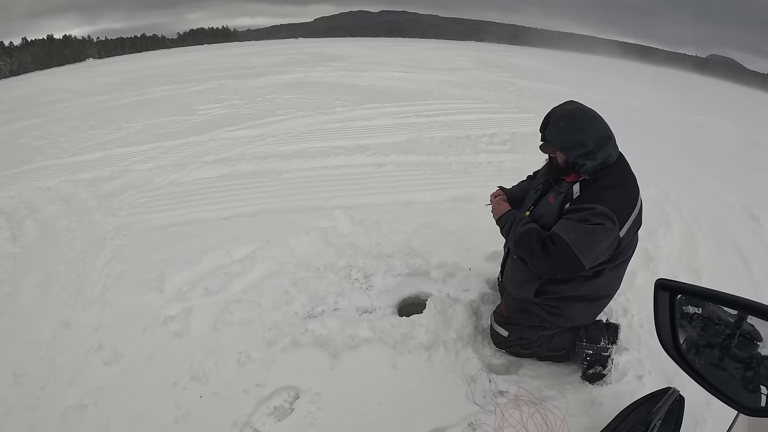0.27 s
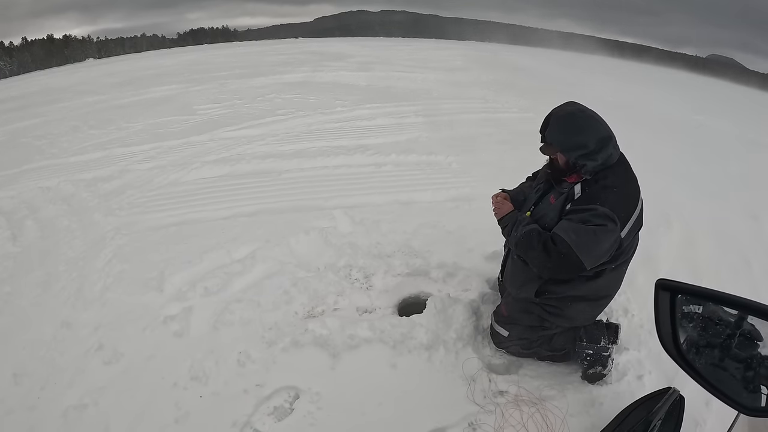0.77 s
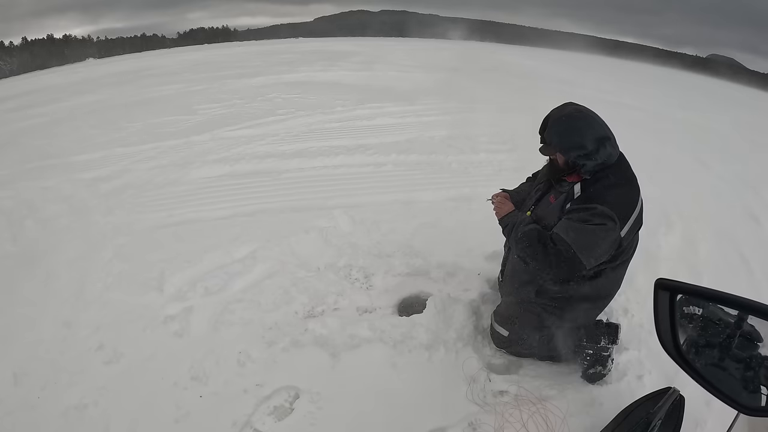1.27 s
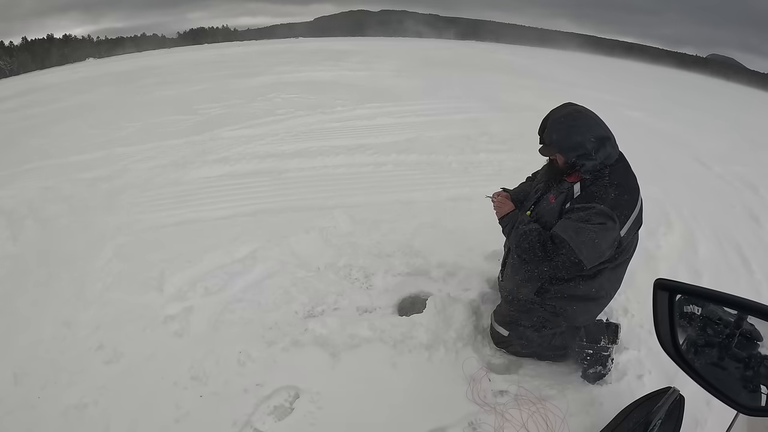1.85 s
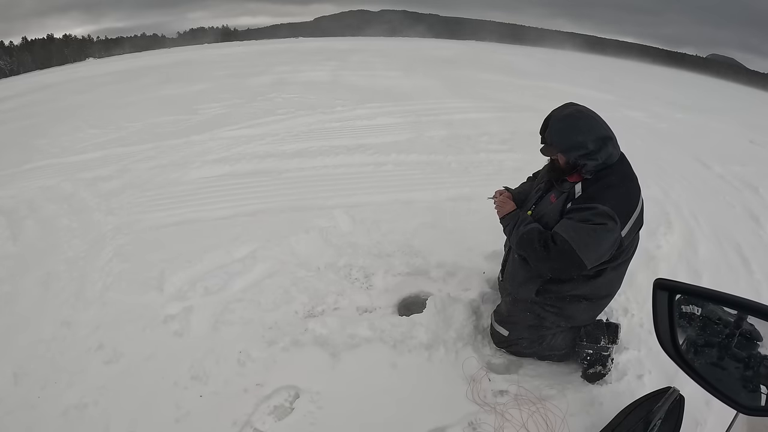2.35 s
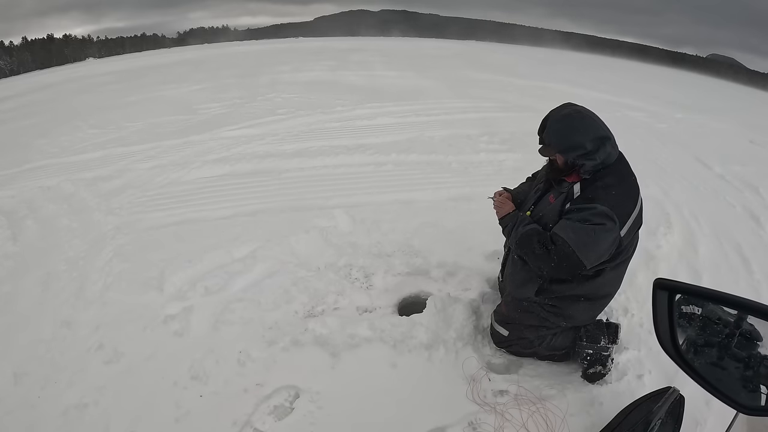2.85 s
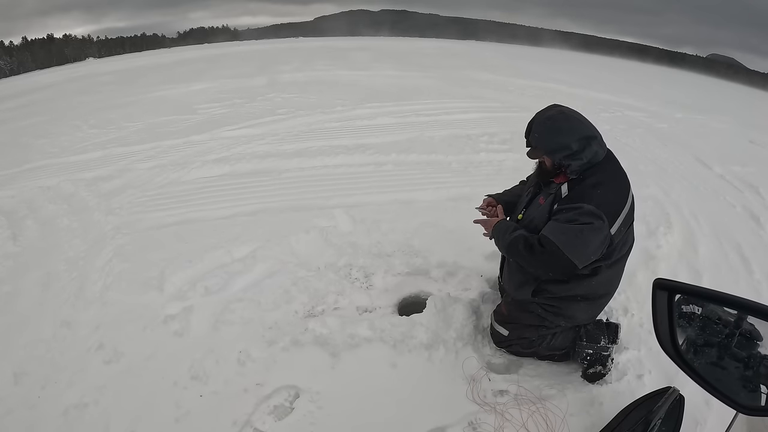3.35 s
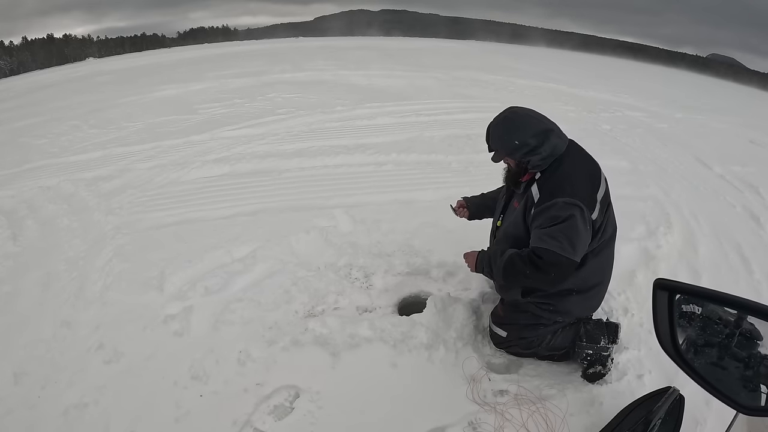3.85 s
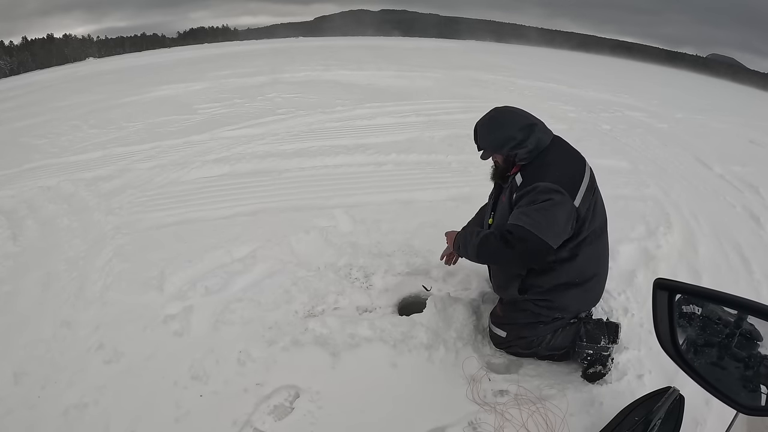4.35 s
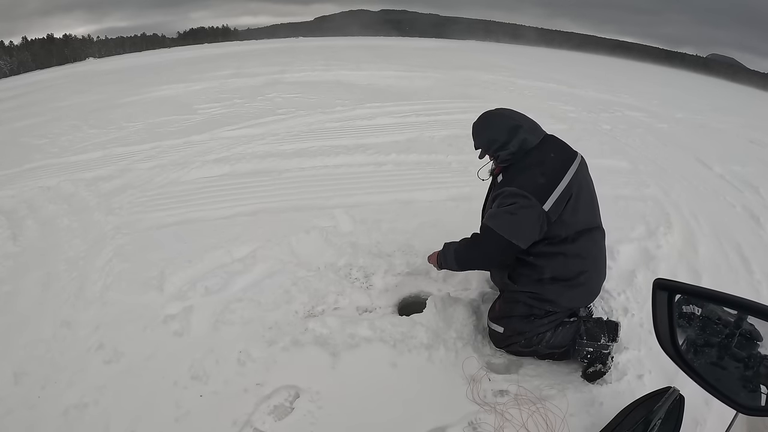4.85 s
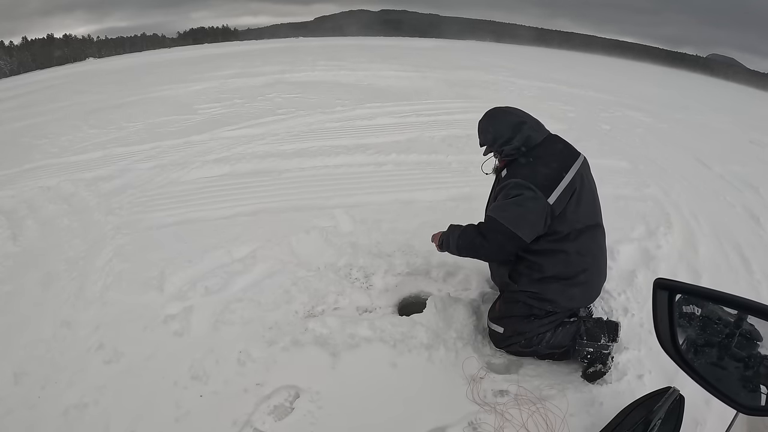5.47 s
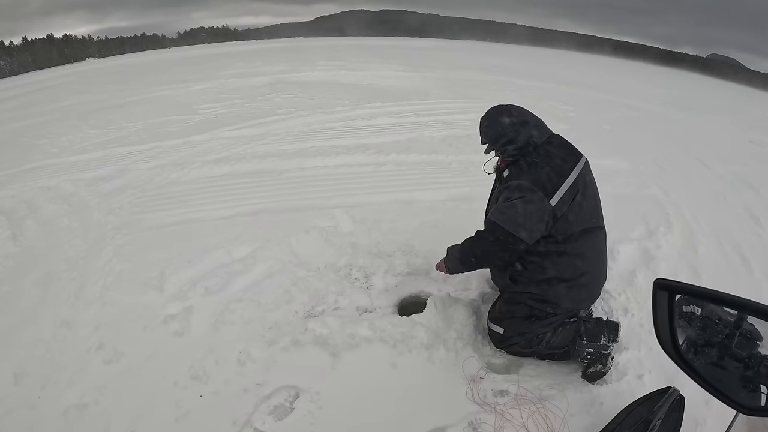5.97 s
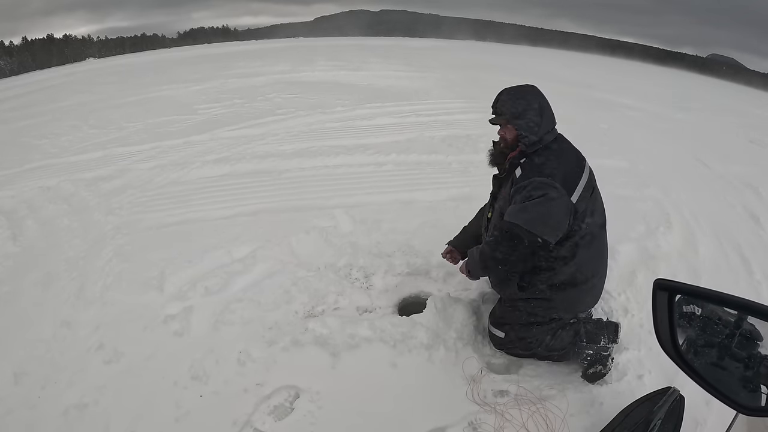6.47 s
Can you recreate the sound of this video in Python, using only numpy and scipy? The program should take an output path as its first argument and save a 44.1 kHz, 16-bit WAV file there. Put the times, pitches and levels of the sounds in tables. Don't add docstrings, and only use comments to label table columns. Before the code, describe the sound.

Continuous strong wind blows directly on a small housed microphone on an open snowy lake. Deep thumps and low rumble dominate, with a duller roar and thin hiss above. The gusts flutter irregularly, swelling early, then thumping harder towards the end. A few tiny ice grains tick on the casing. No echo, no voice.

```python
import sys
import numpy as np
from scipy import signal
from scipy.fft import rfft, irfft
from scipy.io import wavfile
from scipy.ndimage import uniform_filter1d

SR = 44100
rng = np.random.default_rng(int(sys.argv[2]) if len(sys.argv) > 2 else 0)


def transcribe(signal):
    frames = np.atleast_2d(signal).T
    limited = np.clip(frames, -1, 1)
    pcm = np.round(limited * 32767).astype(np.int16)
    wavfile.write(sys.argv[1], SR, pcm)


def invert_db(x):
    u = np.asarray(x, float) / 20
    return 10 ** u


N = 296352
HZ = np.fft.rfftfreq(N, 1 / SR) + 1e-3


def wind(burst_db=0.17, fine_db=0.91, shared_db=0.5, own_db=0.35):
    # time in seconds, wind strength in dB, how squarely it strikes the port in dB.
    gusts = [(0.03, -49.5, 26.5), (0.12, -52, 26.5), (0.16, -48, 25.5), (0.36, -41, 16.5), (1.1, -45, 19.5),
             (1.31, -44, 16), (1.72, -47.5, 21.5), (1.92, -49.5, 18), (2.77, -48, 20.5),
             (2.89, -49.5, 20.5), (3.55, -51.5, 24), (4.0, -48.5, 20.5), (4.13, -51, 20.5),
             (4.59, -51, 22.5), (5.22, -54, 26.5), (5.45, -50, 25), (6.32, -49, 22), (6.69, -51.5, 23)]
    # frequency in Hz, dB per dB of strength, dB per dB of square strike.
    response = [
        (89.5, 1.5, 1.49),
        (450, 1.0, 0.39),
        (2500, 1.0, -0.02),
        (6500, 1.63, 0.35),
        (11000, 1.5, 0.4),
    ]
    # time in seconds, frequency of their size in Hz, lift in dB.
    vortices = [(0.095, 84, 2), (0.269, 59.7, 11.5), (0.369, 678, 0), (0.449, 486, -1), (0.454, 81.4, 10.5),
                (0.988, 120, 5), (1.382, 478, 5.5), (1.716, 59.5, 0), (2.115, 60.4, 4.5),
                (2.504, 84.4, 4.4), (2.599, 84, 2.5), (2.699, 171, 4.5), (2.774, 61, 3.5), (2.784, 960, 6),
                (3.452, 58, -3.5), (3.577, 59, 8.5), (3.746, 124, 7.5), (3.871, 59.7, 5.5),
                (4.006, 336, -0.5), (4.475, 85, 9), (4.749, 84, 3), (4.834, 60.6, 11), (5.268, 674, 8),
                (5.807, 60.5, 13), (5.862, 339, 8), (5.897, 61.6, 11), (6.071, 240, 8), (6.465, 88, 13.5)]
    # time in seconds, frequency of their size in Hz, lift in dB.
    puffs = [(.28, 3500, 1), (.47, 2000, 1.5), (.61, 6000, -0.5), (1.21, 5000, 0.5), (1.44, 3000, 0),
             (2.69, 2000, 3.5), (3.0, 3000, 3), (3.14, 4000, -4), (3.31, 2500, -3), (3.40, 2500, 0),
             (3.59, 3000, -2), (3.66, 4000, 0), (4.02, 2500, 1.5), (5.38, 3000, 2.5), (6.07, 11000, 0.5),
             (5.8, 7970, 2), (6.27, 5000, 2), (6.46, 3500, 3.5)]
    # time in seconds, frequency in Hz, lift in dB.
    spindrift = [
        (1.3, 9000, 1.5),
        (2.0, 11000, 3),
        (2.75, 11000, -2),
        (6.05, 12000, 5),
        (6.5, 12000, 3),
    ]

    gust_s, *columns = np.transpose(gusts)
    t = np.arange(N) / SR
    strength, strike = (np.interp(t, gust_s, c - np.mean(c)) for c in columns)
    hz, per_strength, per_strike = np.transpose(response)
    size_octave = np.log2(hz)
    burst, fine, shared = walk(30), walk(70), walk(20)
    turbulence = 0
    for octave in np.arange(4, 14.1, .5):
        db = np.interp(octave, size_octave, per_strength) * strength
        db += np.interp(octave, size_octave, per_strike) * strike
        db += passing(vortices, 0.011, 0.76, octave)
        db += passing(puffs, 0.03, 2.3, octave)
        db += passing(spindrift, 0.14, 0.68, octave)
        db -= 10 * np.log10(np.mean(invert_db(db) ** 2))
        shared = 0.77 * shared + 0.48 * walk(18)
        db += burst_db * burst + fine_db * fine + shared_db * shared
        db += own_db * walk(6)
        turbulence = turbulence + invert_db(db) * band(rng.standard_normal(N), octave, 0.52)
    heard = irfft(rfft(turbulence) * housing(), N)
    return level(heard, -25.5)


def passing(rows, length_s, octaves, octave):
    s, hz, db = np.transpose(rows)
    t = np.arange(0, N / SR, .002)
    bells = np.exp(-.5 * ((t[:, None] - s) / length_s) ** 2)
    likeness = np.exp(-.5 * ((octave - np.log2(hz)) / octaves) ** 2)
    return np.interp(np.arange(N) / SR, t, bells @ (db * likeness))


def walk(rate):
    hold = int(SR / rate)
    w = np.repeat(rng.standard_normal(N // hold + 1), hold)
    w = uniform_filter1d(uniform_filter1d(w, hold), hold)[:N]
    return w / w.std()


def band(x, octave, width):
    away = np.clip((np.log2(HZ) - octave) / width, -1, 1)
    return irfft(rfft(x) * np.cos(away * np.pi / 2), N)


def housing():
    # frequency in Hz, spectrum level in dB per Hz.
    through_housing = [(15, -35.5), (25, -9.5), (55, -0.5), (146, 0.5), (363, -4.5), (475, -9.5), (537, -8),
                       (835, -12.5), (1020, -22), (1330, -27), (4000, -37), (7230, -52.5), (8800, -65),
                       (11400, -95), (19400, -120)]
    # frequency in Hz, spectrum level in dB per Hz.
    through_port = [
        (9250, -67.5),
        (9600, -65),
        (11500, -61),
        (12400, -66),
        (13100, -75.5),
        (13800, -88),
    ]
    below = [row for row in through_housing if row[0] < 9000]
    hz, db = np.transpose(below + list(through_port))
    notch_hz, notch_width_hz, notch_db = 9085, 100, -27
    notch = notch_db * np.exp(-((HZ - notch_hz) / notch_width_hz) ** 2)
    return invert_db(np.interp(np.log(HZ), np.log(hz), db) + notch)


def level(x, db):
    return x * invert_db(db) / np.sqrt(np.mean(x ** 2))


def ice(shell_hz=4700, port_hz=11300, shell_s=.00012, port_s=.0003, stray_rate=30, stray_db=-72, spread_db=5.0):
    # time in seconds, peak level in dB, port ring relative to the shell in dB.
    grains = [(0.183, -45, -33), (0.264, -30, -32), (2.9697, -39, -14), (3.1697, -47, -30),
              (3.2607, -31, -30), (3.7465, -52, -10), (3.8882, -51, -1), (4.1252, -48, -6),
              (4.1300, -53, -8), (4.678, -51, -7), (4.9395, -37, -22), (5.040, -39, -20), (5.624, -48, -25),
              (6.088, -50, -14)]
    stray = rng.random((int(stray_rate * N / SR), 2))
    faint = [(a * (N / SR - .01), stray_db - spread_db * np.log(b), -12.0) for a, b in stray]
    rows = list(grains) + faint
    chance = rng.standard_normal((len(rows), 400))
    knocks = np.zeros((2, N + 400))
    for (s, db, port_db), c in zip(rows, chance):
        shell_knock = ring(shell_hz, shell_s, c)
        port_knock = invert_db(port_db) * ring(port_hz, port_s, c[::-1])
        start = int(s * SR)
        knocks[:, start:start + len(c)] += invert_db(db) * np.array([shell_knock, port_knock])
    shell_gain = np.interp(HZ, (900, 2500, 7500, 9000), (0, 1, 1, 0))
    port_gain = np.interp(HZ, (9100, 9600, 12500, 13500), (0, 1, 1, 0))
    return irfft(rfft(knocks[0, :N]) * shell_gain + rfft(knocks[1, :N]) * port_gain, N)


def ring(hz, decay_s, chance):
    t = np.arange(len(chance)) / SR
    knock = np.exp(-t / decay_s) * (np.sin(2 * np.pi * hz * t) + .4 * chance)
    return knock / np.abs(knock).max()


def scene():
    return (wind() + ice())[None]


def low_pass(x):
    return signal.sosfilt(signal.butter(12, 13480, fs=SR, output="sos"), x)


def record(dry):
    return low_pass(dry)


dry = scene()
out = record(dry)
transcribe(out)
```